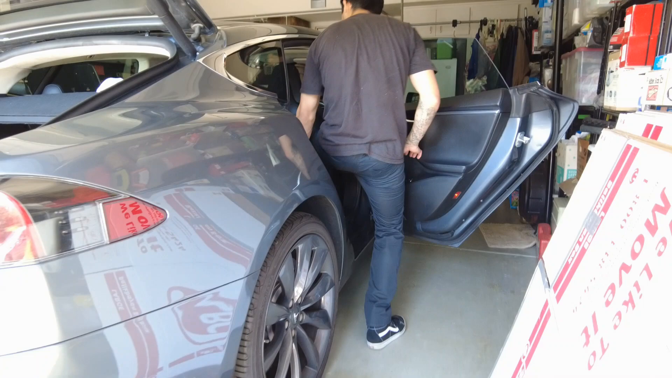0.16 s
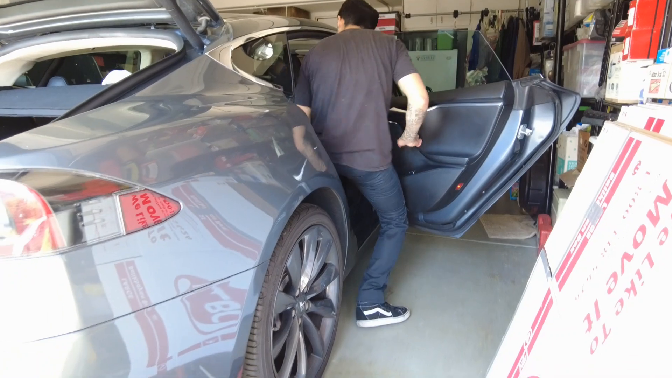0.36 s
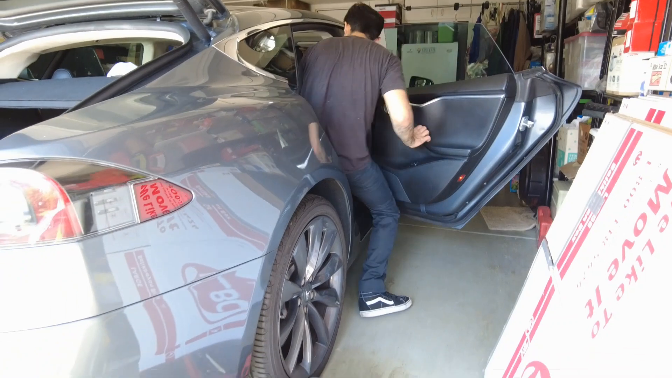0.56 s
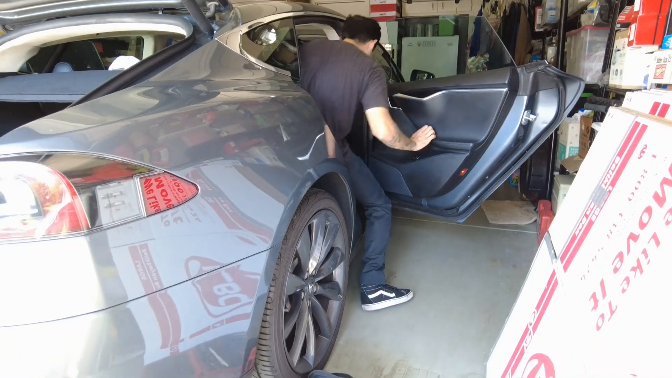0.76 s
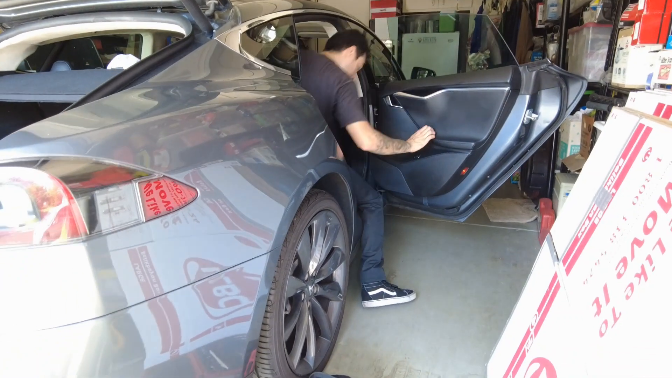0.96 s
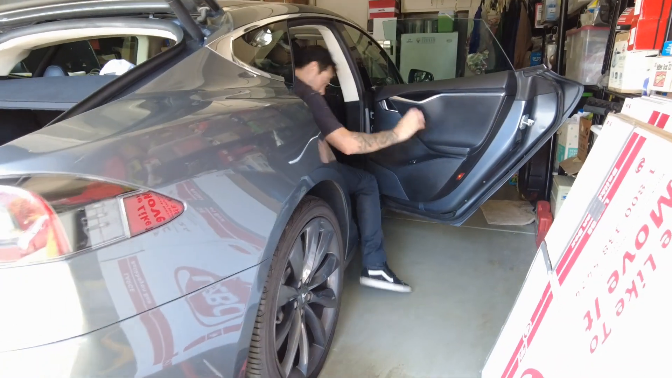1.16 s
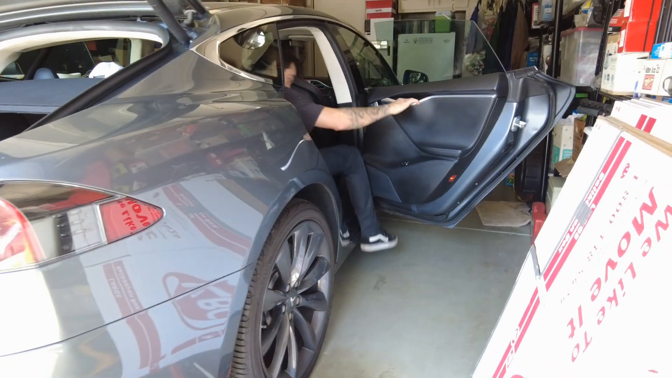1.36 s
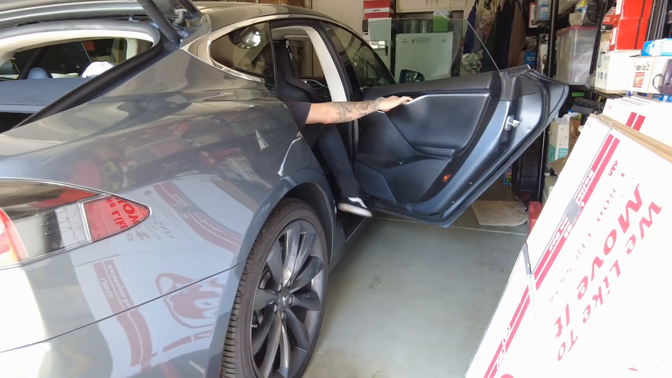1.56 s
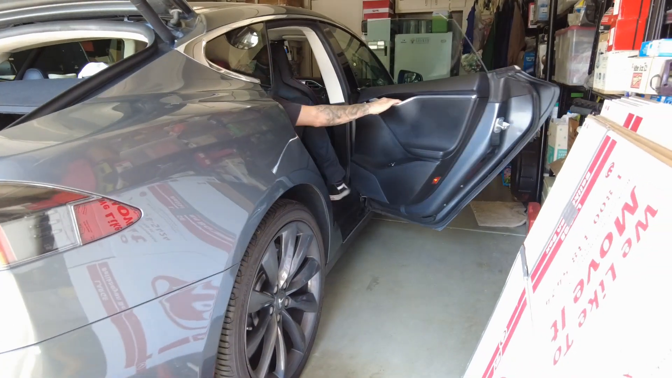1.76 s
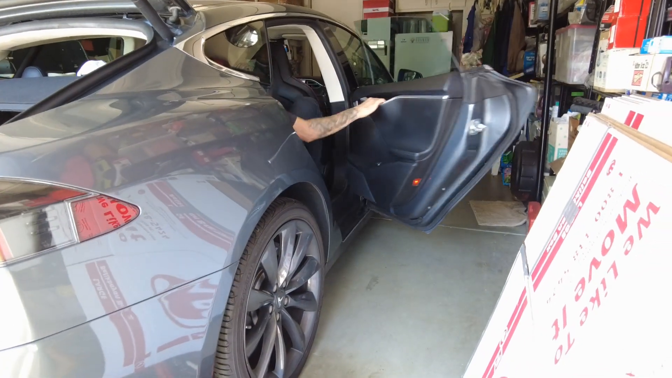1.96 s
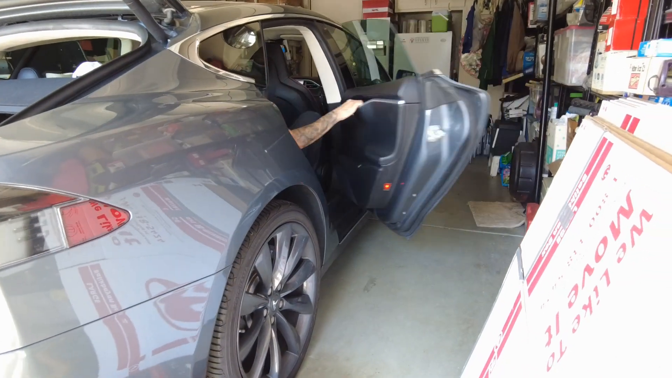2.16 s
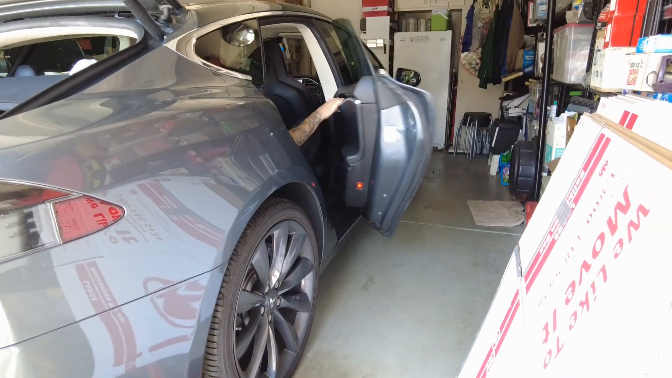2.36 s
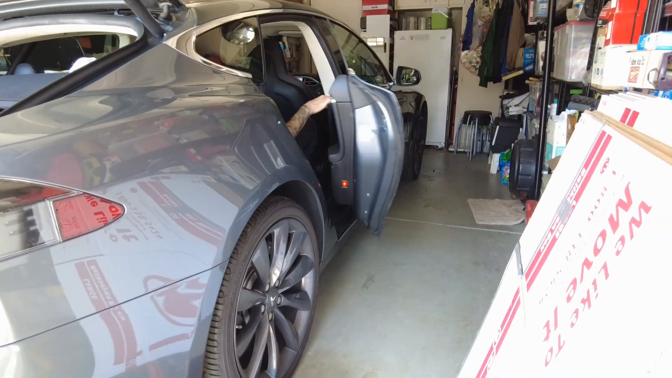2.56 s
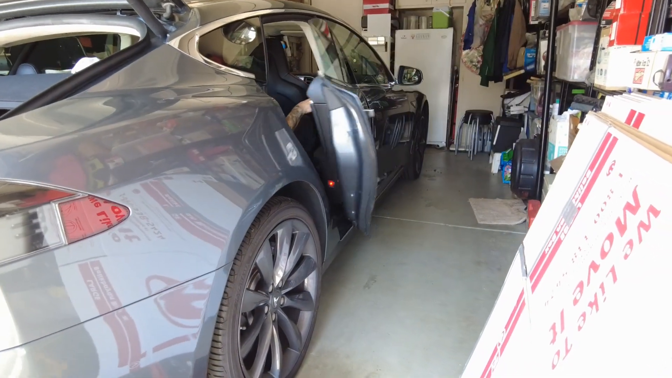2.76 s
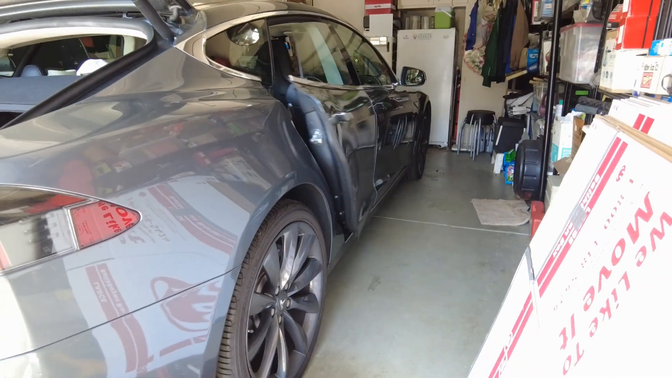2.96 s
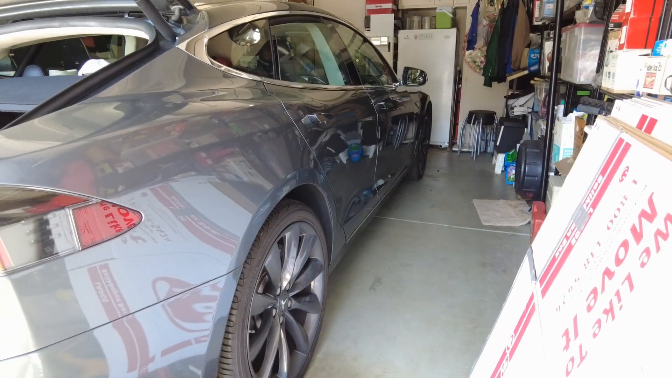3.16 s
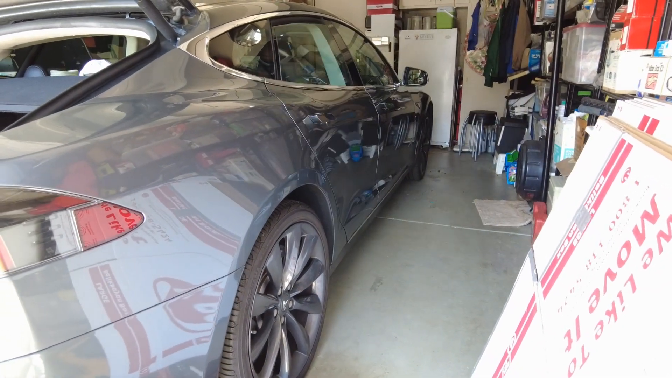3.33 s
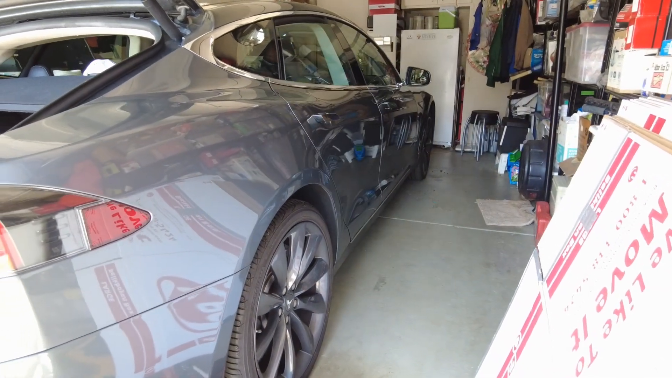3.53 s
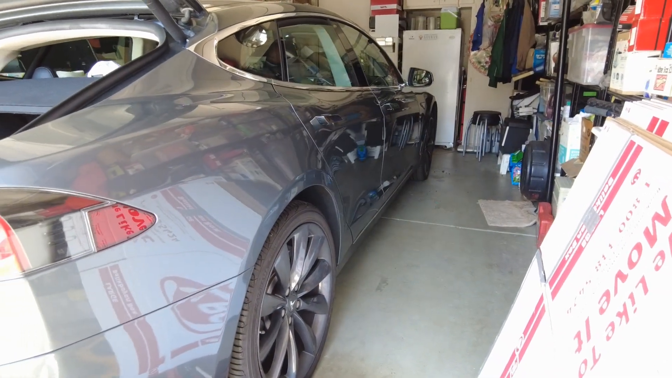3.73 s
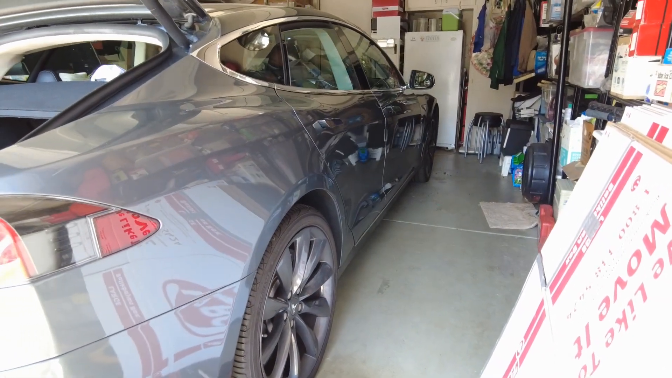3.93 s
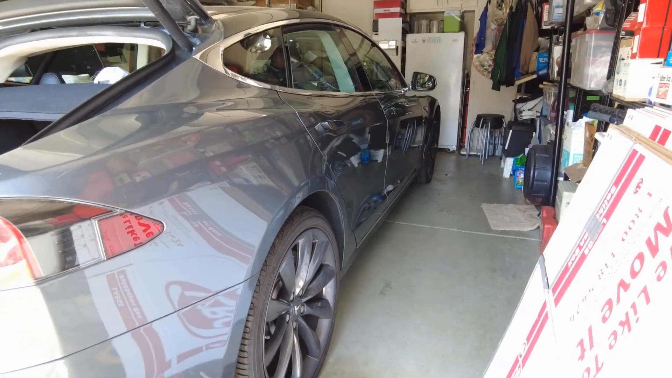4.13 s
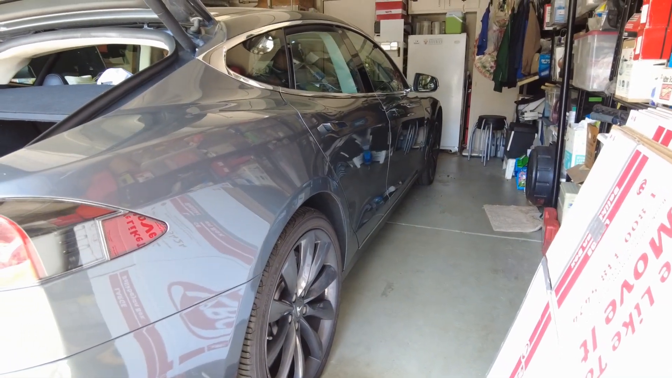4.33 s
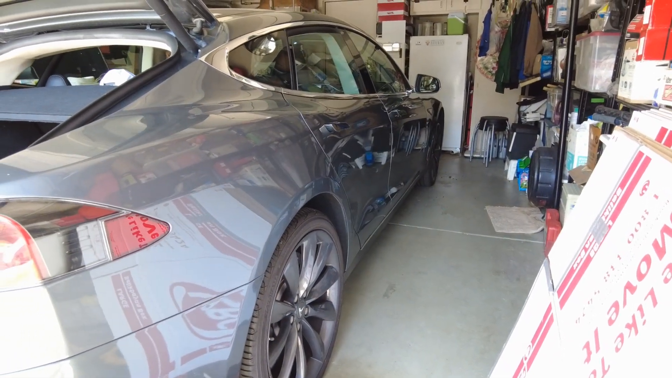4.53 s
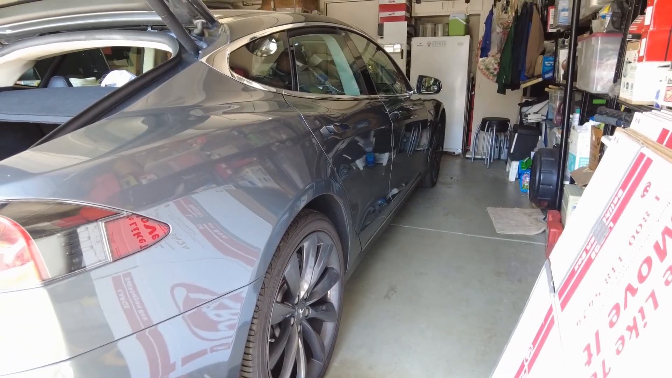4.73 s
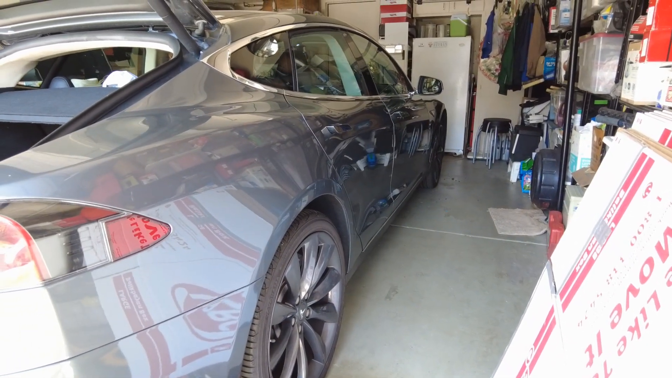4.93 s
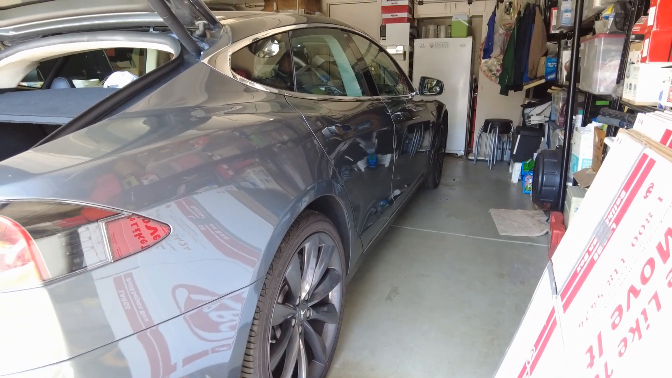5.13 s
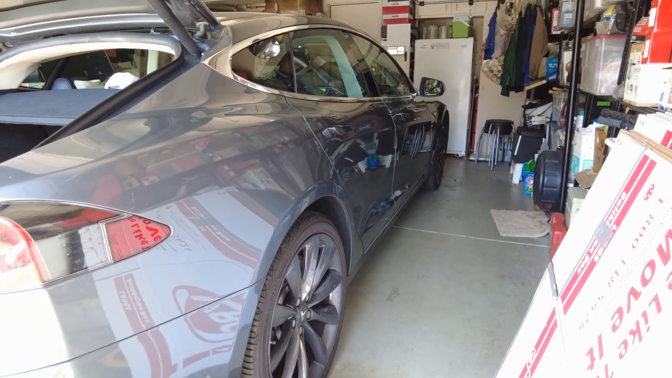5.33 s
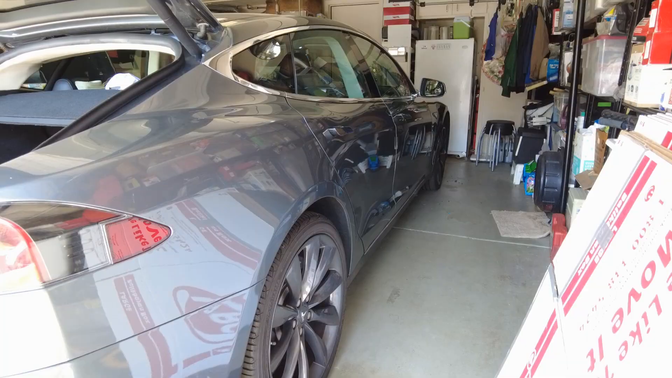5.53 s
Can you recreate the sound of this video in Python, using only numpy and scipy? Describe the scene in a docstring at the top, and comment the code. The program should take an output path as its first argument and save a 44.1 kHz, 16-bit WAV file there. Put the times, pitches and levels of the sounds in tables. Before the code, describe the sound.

Close stereo microphones a few metres from a car in a cluttered garage. Low fan hum runs throughout. A shoe knocks at once, light cloth rustles follow, then a cluster of clicks and dull thuds with a tiny seat squeak. After a pause the door slams hard, with latch snap, ringing panels and deep boom. Hum remains, with a small muffled knock near the end.

```python
"""Car door in a garage

Someone steps into a car parked in a cluttered garage, sits down and pulls the door shut.
Shoes knock as clicks, woody noise and thuds; clothes rustle as grainy filtered noise; the seat squeaks.
The slam drives ringing panels and metallic crackle, the latch snaps, and slow body modes boom.
Fans hum behind it all as noise and steady tones, with a thin whine that comes and goes.
Two close microphone ports hear the scene a few metres away, with the garage's tail.
"""
import sys
import numpy as np
from scipy import signal
from scipy.fft import rfft, irfft
from scipy.io import wavfile
from scipy.ndimage import uniform_filter1d, map_coordinates

SR = 44100
rng = np.random.default_rng(int(sys.argv[2]) if len(sys.argv) > 2 else 0)


def generate_wav(sig):
    """Save sig (samples, or channels by samples) to the path in sys.argv[1] as 16-bit PCM at SR."""
    pcm = np.round(np.clip(np.atleast_2d(sig).T, -1, 1) * 32767).astype(np.int16)
    wavfile.write(sys.argv[1], SR, pcm)


N = 250929
T = np.arange(N) / SR
HZ = np.maximum(np.fft.rfftfreq(N, 1 / SR), 1)


def undb(db):
    """Amplitude factor of a level in dB."""
    return 10 ** (np.asarray(db) / 20)


def on_log(table, hz, axis=1):
    """One column of a frequency table, read on a log axis."""
    rows = np.array(table, float)
    return np.interp(np.log(hz), np.log(rows[:, 0]), rows[:, axis])


def unit(x):
    """Scale to rms 1."""
    return x / np.sqrt(np.mean(x ** 2))


def noise(gain):
    """Noise of rms 1 with the given gain per frequency."""
    return unit(irfft(rfft(rng.standard_normal(N)) * gain, N))


def bump(hz, width_hz):
    """Gain of a resonance, 1 at its centre."""
    return 1 / np.sqrt(1 + ((HZ - hz ** 2 / HZ) / width_hz) ** 2)


def peak(hz, width_hz):
    """Causal response of a resonance, 1 at its centre."""
    return 1 / (1 + 1j * (HZ - hz ** 2 / HZ) / width_hz)


def fade(start, t60):
    """Envelope that rises within about a millisecond and dies away."""
    age = np.maximum(T - start, 0)
    return (1 - np.exp(-age / .0006)) * np.exp(-np.log(1000) * age / t60)


def swell(start, hold, rise_db_s, fall_db_s):
    """Envelope that climbs to 1 at start, holds and falls away, straight in dB."""
    before = np.maximum(start - T, 0)
    after = np.maximum(T - start - hold, 0)
    return undb(-rise_db_s * before - fall_db_s * after)


def ring(x, hz, t60):
    """One damped mode driven by x."""
    pole = np.exp(2j * np.pi * hz / SR - np.log(1000) / (t60 * SR))
    return signal.lfilter([1], [1, -pole], x).imag


def walk(rate):
    """Random levels held 1 / rate s and slewed twice; spread 1."""
    k = int(SR / rate)
    steps = np.repeat(rng.standard_normal(N // k + 1), k)[:N]
    slewed = uniform_filter1d(steps, k, mode="wrap")
    return unit(uniform_filter1d(slewed, k, mode="wrap"))


# the two ports: (f/Hz, left lead/rad, left minus right/dB, likeness/0-1)
PORTS = [(20, 0, -4, .995), (70, .1, -1.5, .99), (170, .45, -.5, .97), (220, .25, -.6, .99),
         (290, .8, -.8, .99), (400, 1.25, -.6, .97), (800, 1.7, 0, .9), (1100, 3.3, .5, .7),
         (1250, .7, .5, .9), (1800, .6, .5, .8), (2500, 1.1, .7, .55), (4000, 2.9, 3.2, .3),
         (8000, 4.5, 3.5, .25), (15000, 6.1, 6.5, .3)]


def port_gains(hz):
    """Complex gains of left and right for a sound that both ports share."""
    half = undb(on_log(PORTS, hz, axis=2) / 2) * np.exp(.5j * on_log(PORTS, hz))
    return np.array([half, 1 / half])


def ports(shared, own=None):
    """Left and right of a shared sound; a diffuse one is blended with what each port hears alone."""
    blend = rfft(shared)
    if own is not None:
        like = np.clip(on_log(PORTS, HZ, axis=3), 0, 1)
        blend = np.sqrt(like) * blend + np.sqrt(1 - like) * rfft(own)
    return irfft(blend * port_gains(HZ), N)


# colour of the garage air: (f/Hz, relative level per Hz/dB)
AIR = [(18, -4.5), (32, 5), (62, 0), (85, -6), (110, -9.5), (185, -16.5), (440, -20.5), (800, -18),
       (1000, -24.5), (1300, -22.5), (2000, -35), (3200, -38.5), (4700, -47.5), (8000, -53.5),
       (11000, -72.5), (15700, -66)]
# resonances that lift or dip that colour: (f/Hz, width/Hz, level/dB)
AIR_PEAKS = [(262.8, 77, 17.5), (342.2, 56, 9.5), (511, 26, 7), (669, 114, 5.5), (1294, 260, -3.5),
             (1860, 78, 6), (2890, 660, 6), (4280, 190, 7.5)]
AIR_DB = -34.5  # rms of the air before the ports
# steady fan tones, the first two beating: (f/Hz, rms level/dB)
FANS = [(158.6, -62), (162.3, -50.5), (1880, -76)]
# a thin whine that comes and goes: (t/s, rms level/dB)
WHINE = [(0, -63), (.8, -51.5), (1.19, -46.5), (1.65, -54), (1.96, -54.5), (3.4, -69), (5.69, -78)]
WHINE_HZ = 909


def garage():
    """Broad fan noise in octave bands that swell together and flicker alone, under steady tones and a whine."""
    resonances = sum(db * bump(hz, width) ** 2 for hz, width, db in AIR_PEAKS)
    colour = undb(on_log(AIR, HZ) + resonances)
    air_spectra = rfft(rng.standard_normal((3, N))) * colour  # one shared, one for each port alone
    octave = np.log2(HZ / 16)
    slow_swell = walk(0.089)
    air = 0
    for k in range(11):
        band = irfft(air_spectra * np.clip(1 - abs(octave - k), 0, 1), N)
        air = air + band * undb(.5 * slow_swell + 1.3 * walk(7))
    air = unit(air) * undb(AIR_DB)

    whine_db = np.interp(T, *np.transpose(WHINE))
    tones = 0
    for hz, db in [*FANS, (WHINE_HZ, whine_db)]:
        level = np.sqrt(2) * undb(db + 0.5 * walk(2.4))
        phase = np.cumsum(2 * np.pi * hz * (1 + 0.0004 * walk(2.3)) / SR)
        tones = tones + level * port_gains(hz)[:, None] * np.exp(1j * phase)
    return ports(air[0], air[1:]) + tones.real


# shoes and hands on floor, sill and trim:
# (t/s, click level/dB, click f/Hz, body level/dB, thud level/dB, thud f/Hz)
KNOCKS = [(0.016, -32.5, 2390, -28.5, -23, 168), (0.0232, -32.5, 2000, -35, -37, 255),
          (.031, -34, 1800, -35, -16.5, 160), (.038, -42, 1800, -47, -30.5, 200),
          (0.051, -52, 1790, -60, -31, 129), (0.756, -55, 8000, -60, -60, 200),
          (0.784, -54, 7000, -57, -50, 200), (1.359, -48, 5100, -32.5, -56, 304),
          (1.423, -44.5, 2500, -39, -23.5, 282), (1.691, -46, 3000, -51, -42, 300),
          (1.746, -35, 2000, -32.5, -33.5, 191), (1.7493, -37, 1400, -33, -28.5, 152),
          (1.758, -57, 1300, -33, -16.5, 192), (1.7691, -25.5, 1840, -40, -26, 308),
          (1.772, -25, 1410, -44, -47, 400), (1.7749, -35.5, 2000, -40, -42, 490),
          (1.787, -54, 1390, -54, -21.5, 137), (2.252, -63, 1500, -50, -50, 300),
          (4.308, -47, 1500, -49, -55, 300), (5.288, -47, 1500, -40, -54, 300),
          (5.4396, -41, 1510, -34, -29, 407), (5.4442, -44, 3200, -50, -46, 300),
          (5.4481, -49, 1500, -41, -18, 260), (5.456, -50, 1500, -51, -39, 300),
          (5.463, -57, 1500, -47, -23, 154)]
# sill and trim ring in the clicks: (f/Hz, width/Hz, level/dB)
TRIM = [(1180, 300, -2), (1480, 210, 5), (2190, 400, -7), (3000, 690, -1), (4390, 490, -5.5)]
TRIM_GAP_DB = -17  # even floor added under the trim resonances
CLICK_T60_S, TICK_DB = 0.029, 16  # the rattle of a click; the first contact over it
KNOCK_T60_S = 0.095  # woody body
THUD_CYCLES = 8.5  # the thud's t60 in cycles, so deep ones last longer


def knocks():
    """A sharp click, a woody body below it and a dull ringing thud for each knock."""
    clicks, body = 0, 0
    white = rng.standard_normal(N)
    woody = noise(bump(540, 1100) ** 2)
    trim = undb(TRIM_GAP_DB) + sum(undb(db) * peak(hz, width) for hz, width, db in TRIM)
    for s, click_db, click_hz, body_db, thud_db, thud_hz in KNOCKS:
        colour = trim * peak(click_hz, 1.5 * click_hz) ** 3
        colour = colour / np.sqrt(np.mean(abs(colour) ** 2))
        tick = undb(TICK_DB) * (np.arange(N) == int(s * SR))  # a single-sample contact
        contact = fade(s, CLICK_T60_S) * white + tick
        clicks = clicks + undb(click_db) * rfft(contact) * colour
        tone = np.sin(2 * np.pi * thud_hz * (T - s))
        thud = fade(s, THUD_CYCLES / thud_hz) * undb(thud_db) * tone
        body = body + thud + fade(s, KNOCK_T60_S) * undb(body_db) * woody
    # soft contacts: little treble in body and thud
    soft_body = rfft(body) / (1 + (HZ / 1600) ** 4)
    return irfft(clicks + soft_body, N)


# strokes of cloth and soles, levels before the grain:
# (start t/s, hold/s, hiss level/dB, body minus hiss/dB, dull drag minus hiss/dB)
RUSTLE = [(0.019, 0.011, -58.5, -3, -5), (0.11, 0.013, -53.5, 4.5, 8), (0.23, 0.038, -88, 7, 10),
          (0.386, 0.074, -76, 17.5, 28.5), (0.502, 0.12, -73.5, -2, 0), (0.74, 0.069, -62, -3, -2),
          (0.87, 0.095, -75.5, 18, 22), (1.003, 0.16, -75, 15.5, 21), (1.176, 0.17, -74.5, 12.5, 26),
          (1.368, 0.04, -62, -5, -4), (1.43, 0.045, -68.5, 14, 17), (1.525, 0.091, -65.5, 11, 16),
          (1.686, 0.074, -65.5, 4, 19), (1.768, 0.028, -52, 2, 8), (1.853, 0.04, -63.5, -7, 0),
          (1.93, 0.029, -75.5, 14, 24), (2.025, 0.011, -61.5, 1, 4), (2.113, 0.39, -74.5, -10, 3)]
STROKE_RISE_DB_S, STROKE_FALL_DB_S = 505, 263
# the seat squeaks: (start t/s, end t/s, f/Hz, width/Hz, level at the crest/dB, octave level/dB)
SQUEAK = (1.555, 1.635, 2170, 380, -47.5, -15)


def rustle():
    """Grainy rubbing strokes, a bright hiss over a duller body and drag, and one short squeak."""
    grain = undb(2.5 * walk(150) + 2 * walk(14))
    hiss = noise(bump(5900, 3400) * (HZ > 3500))
    body = noise(bump(2520, 2900) ** 2)
    drag = noise(bump(730, 590) ** 2)
    strokes = 0
    for s, hold, db, body_db, drag_db in RUSTLE:
        cloth = hiss + undb(body_db) * body + undb(drag_db) * drag
        strokes = strokes + undb(db) * swell(s, hold, STROKE_RISE_DB_S, STROKE_FALL_DB_S) * cloth

    start, end, hz, width_hz, db, octave_db = SQUEAK
    arch = np.sin(np.pi * np.clip((T - start) / (end - start), 0, 1))
    squeak_colour = bump(hz, width_hz) ** 2 + undb(octave_db) * bump(2 * hz, 2 * width_hz) ** 2
    return grain * strokes + undb(db) * arch * noise(squeak_colour)


# the body booms when loaded or struck:
# (crest t/s, hold of the middle mode/s, deep level/dB, middle level/dB, upper level/dB), rms at the crest
BOOM = [(0.289, 0.033, -36, -31, -38), (0.348, 0.11, -38.5, -24, -25.5), (2.697, 0, -42, -35, -50),
        (3.31, 0, -13.5, -54, -14), (3.453, 0.15, -45, -22.5, -53), (5.26, 0.013, -43, -28.5, -31),
        (5.477, 0.042, -33.5, -43, -33)]
# deep, middle and upper mode: (f/Hz), then (fall/dB per s)
BOOM_HZ = (27.2, 33.15, 43.05)
BOOM_FALL_DB_S = (97, 83.5, 107)
BOOM_RISE_DB_S = 213


def boom():
    """Low modes that dip together at each push, then beat; pitch wavers a little, the middle one holds on."""
    phases = [np.cumsum(2 * np.pi * hz * (1 + 0.016 * walk(4.59)) / SR) for hz in BOOM_HZ]
    total = 0
    for s, hold, *levels in BOOM:
        for k, db in enumerate(levels):
            envelope = swell(s, hold * (k == 1), BOOM_RISE_DB_S, BOOM_FALL_DB_S[k])
            dip = -np.cos(phases[k] - phases[k][int(s * SR)])
            total = total + np.sqrt(2) * undb(db) * envelope * dip
    return total


# the latch snaps over its two catches: (t/s, level/dB)
LATCH = [(3.2407, -12.5), (3.2452, -17)]
# the slam, a faint lead-in and then the blows of the closing door:
# (t/s, panel ring level/dB, deep ring level/dB, push length/ms, crack level/dB)
SLAM = [(3.216, -31.5, -56, 1.6, -38), (3.2231, -11, -43, 2.07, -28), (3.230, -18.5, -27, 1.35, -22.5),
        (3.2399, -11.5, -21.5, 0.46, -19), (3.2434, -26, -37, 0.15, -22.5), (3.2506, -15, -23.5, 0.28, -15),
        (3.2628, -27, -35, 4.4, -34), (3.2700, -16, -18, 1, -24.5), (3.285, -33, -20, 2.8, -27),
        (3.294, -29.5, -27.5, 5.4, -33), (3.311, -42, -36, 8.7, -30), (3.334, -44.5, -20, 3.9, -41),
        (3.357, -43, -30.5, 4, -48), (3.377, -42.5, -32.5, 3.2, -58.5)]
# door and wing panels: (f/Hz, level/dB, t60/s)
PANELS = [(60, -3, 0.33), (98.6, 0.5, 0.3), (132.3, 3, 0.22), (150, -5.5, 0.33), (175, -10, 0.2),
          (191.3, -6, 0.17), (225, -10, 0.25), (248, -4, 0.11), (277.5, 3, 0.11), (342, -3, 0.13),
          (370.5, -6.5, 0.17), (414, -10, 0.057), (500, -5.5, 0.044), (627, -15.5, 0.099),
          (723, -19, 0.145), (904, -8.5, 0.067), (1192, -5.5, 0.08), (1425, -8, 0.081), (1544, -7, 0.055),
          (1700, -9.5, 0.051), (2270, -13, 0.03), (2826, -12, 0.05), (3360, -13.5, .04)]
DEEP_HZ = 200  # modes below this belong to the whole door skin
# colour of the metallic crackle: (f/Hz, relative level per Hz/dB)
CRACK = [(70, -32), (150, -7), (220, -12), (300, -6.5), (420, -3.5), (535, -17), (621, -15.5),
         (1050, -15.5), (1470, -21.5), (2100, -24), (2770, -25), (3300, -22), (3600, -34), (4400, -29.5),
         (4870, -31), (7500, -43.5), (9750, -67), (16500, -120)]
CRACK_T60_S = 0.063
RATTLE_DB, RATTLE_T60_S = -31.0, 0.032  # noise that starts with each push, before the ring levels
# treble of the slam, peaking with the latch: (hold/s, level/dB, rise/dB per s, fall/dB per s)
FIZZ = (.012, -39, 1100, 480)


def door():
    """Smooth pushes ring the panels, harder when shorter; rattle and crackle start with each and die away."""
    push = np.zeros((2, N))  # upper panels, deep door skin
    crack = 0
    rattle = rng.standard_normal(N)
    for s, db, deep_db, ms, crack_db in SLAM:
        shape = np.hanning(int(ms * SR / 1000) + 3)
        first = int(s * SR)
        drive = undb(RATTLE_DB) * fade(s, RATTLE_T60_S) * rattle
        drive[first:first + len(shape)] += shape / shape.sum()
        push += undb([[db], [deep_db]]) * drive
        crack = crack + undb(crack_db) * fade(s, CRACK_T60_S)

    panels = 0
    for k, (hz, db, t60) in enumerate(PANELS):
        sign = (-1) ** k  # neighbouring modes start in opposite directions
        panels = panels + sign * undb(db) * ring(push[int(hz < DEEP_HZ)], hz, t60)

    jangle = undb(3 * walk(150))  # loose parts rattle unevenly
    crackle = jangle * crack * noise(undb(on_log(CRACK, HZ)))
    hold, db, rise_db_s, fall_db_s = FIZZ
    treble = undb(db) * swell(LATCH[0][0], hold, rise_db_s, fall_db_s) * (T > SLAM[0][0])
    return panels + crackle + treble * noise(bump(8000, 18000) * (HZ > 4800))


LATCH_HZ, LATCH_WIDTH_HZ, LATCH_T60_S = 2650, 2100, 0.022


def latch():
    """Two short, hard metallic snaps of resonant noise."""
    snaps = sum(undb(db) * fade(s, LATCH_T60_S) for s, db in LATCH)
    return snaps * noise(bump(LATCH_HZ, LATCH_WIDTH_HZ) ** 2)


# the garage's tail: (f/Hz, t60/s, level/dB)
ROOM = [(60, 0.11, -15.5), (300, 0.19, -3.5), (1950, 0.17, -11), (6030, 0.16, -6.5), (14000, 0.069, -15)]
# nearby clutter twists the phase at each port, anew every SCATTER_HZ; more where the ports are less alike
SCATTER_RAD, SCATTER_HZ = .8, 250


def room(dry):
    """The straight path, scattered at each port, then a tail off shelves and walls that dies band by band."""
    tails = np.zeros((3, N))  # one shared, one for each port alone
    t = T[:SR // 2]
    for hz in 60 * 2. ** np.arange(9):
        t60, db = on_log(ROOM, hz), on_log(ROOM, hz, axis=2)
        decay = np.exp(-np.log(1000) * t / t60) * np.clip(t / 0.013, 0, 1)
        share = undb(db) * np.sqrt(1.4 * hz / SR / np.sum(decay ** 2))  # weighted by bandwidth
        for tail in tails:
            tail[:len(t)] += share * decay * noise(bump(hz, .7 * hz) ** 2)[:len(t)]
    knots = rng.standard_normal((2, 200))
    twist = map_coordinates(knots, np.broadcast_arrays([[0], [1]], HZ / SCATTER_HZ))
    unlike = np.sqrt(1 - on_log(PORTS, HZ, axis=3))
    straight = port_gains(HZ) * np.exp(1j * SCATTER_RAD * twist * unlike)
    response = straight + rfft(ports(tails[0], tails[1:]))
    faded_in = dry * np.clip(T / .012, 0, 1)
    return irfft(response * rfft(faded_in), N)


def scene():
    """All sources as the two ports hear them."""
    in_room = room(knocks() + rustle() + door() + latch())
    deep = ports(boom() * signal.windows.tukey(N, 1 / 100))  # soft start and end
    return garage() + in_room + deep


TOP_HZ = 15450


def record(dry):
    """The recorder rounds the loudest peaks, drops the deepest bass and cuts the top."""
    soft = np.tanh(0.6 * dry) / 0.61
    low_cut = signal.butter(2, 18, "high", fs=SR, output="sos")
    top_cut = signal.ellip(10, .2, 80, TOP_HZ, fs=SR, output="sos")
    return signal.sosfilt(top_cut, signal.sosfilt(low_cut, soft))


dry = scene()
out = record(dry)
generate_wav(out)
```